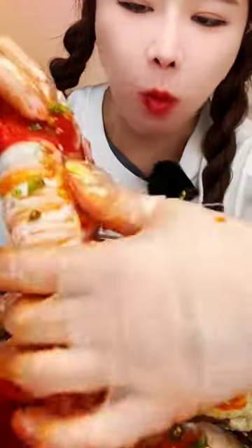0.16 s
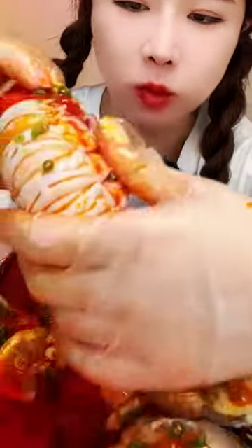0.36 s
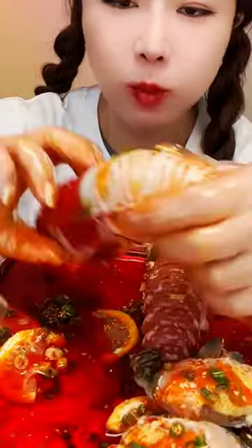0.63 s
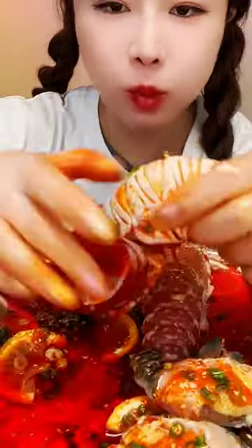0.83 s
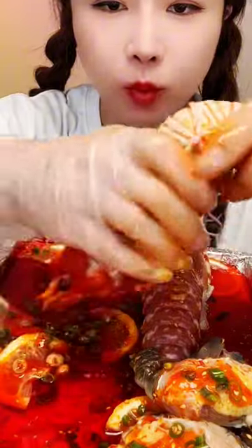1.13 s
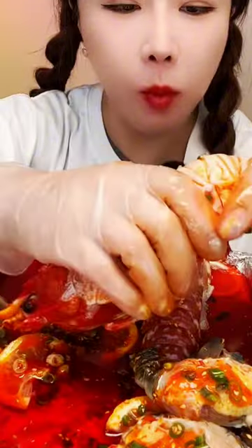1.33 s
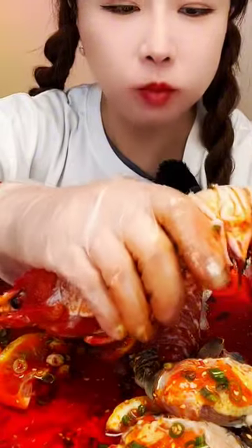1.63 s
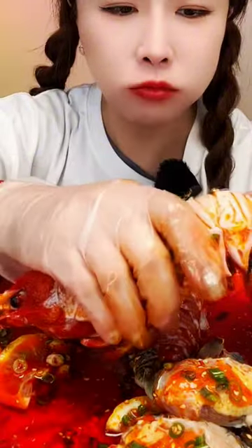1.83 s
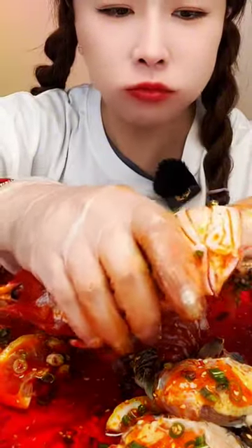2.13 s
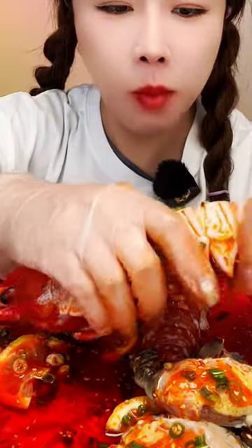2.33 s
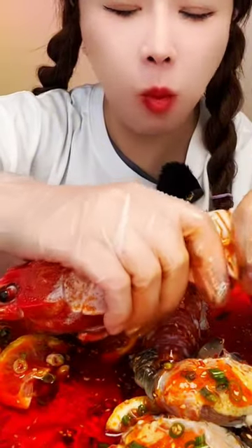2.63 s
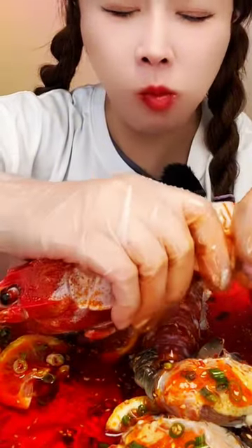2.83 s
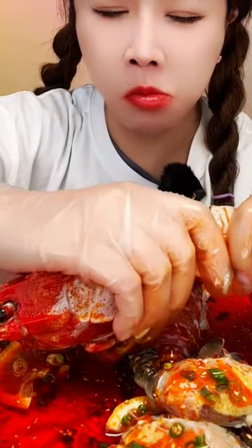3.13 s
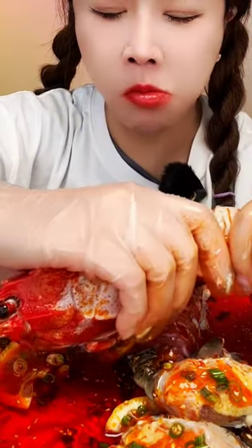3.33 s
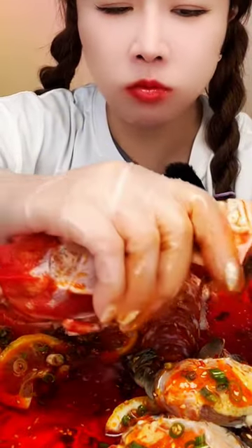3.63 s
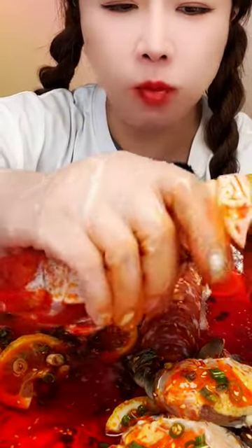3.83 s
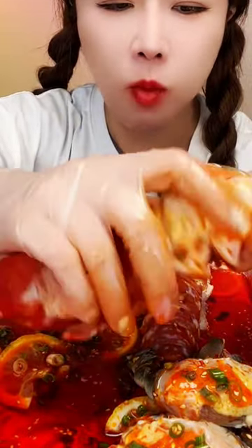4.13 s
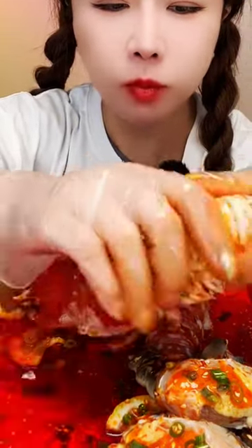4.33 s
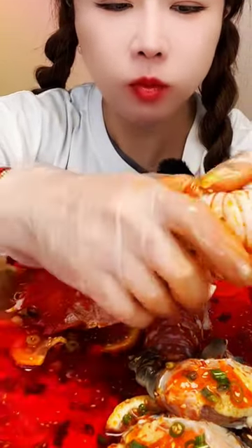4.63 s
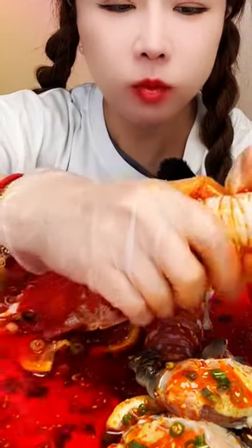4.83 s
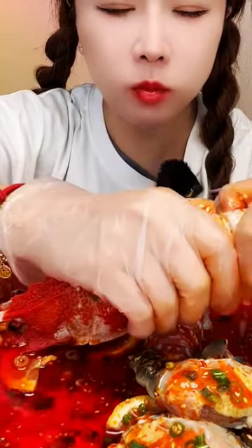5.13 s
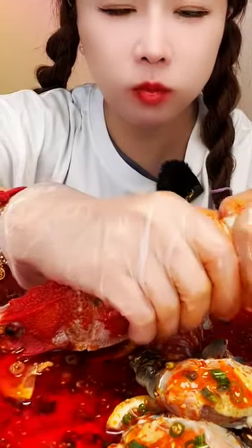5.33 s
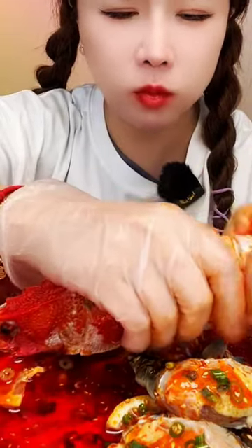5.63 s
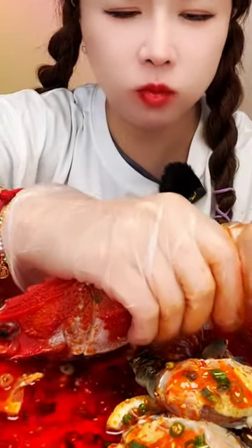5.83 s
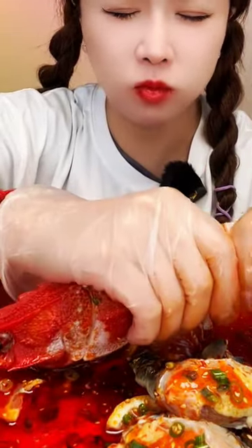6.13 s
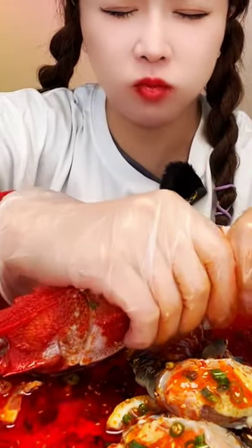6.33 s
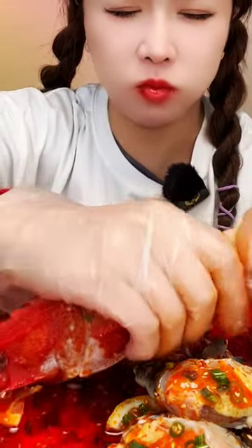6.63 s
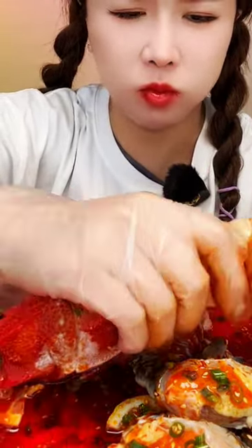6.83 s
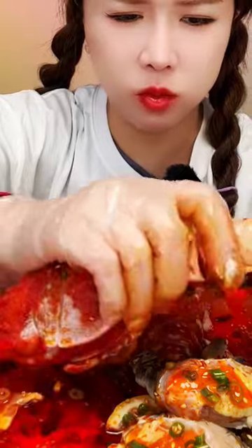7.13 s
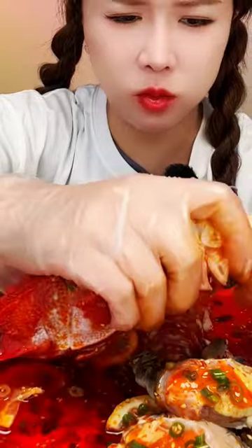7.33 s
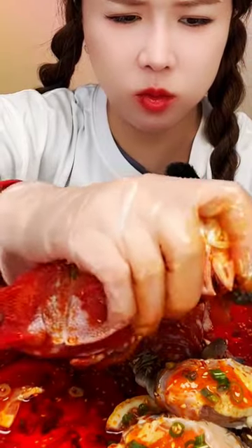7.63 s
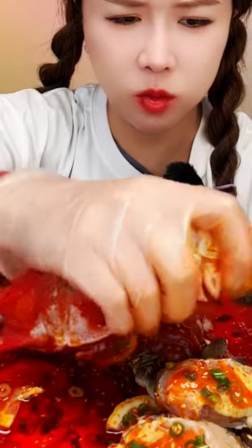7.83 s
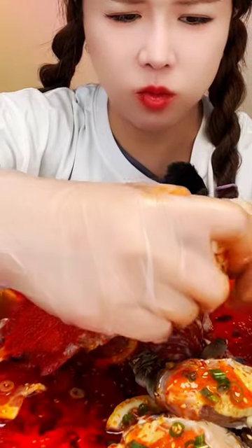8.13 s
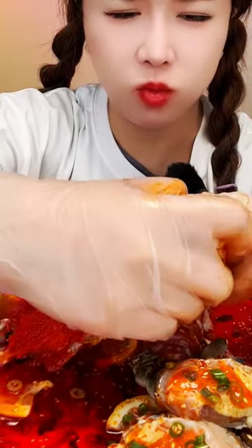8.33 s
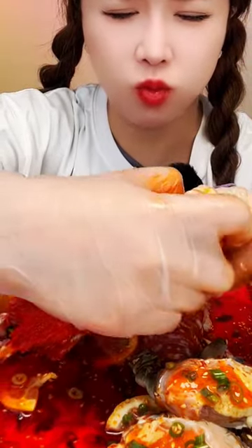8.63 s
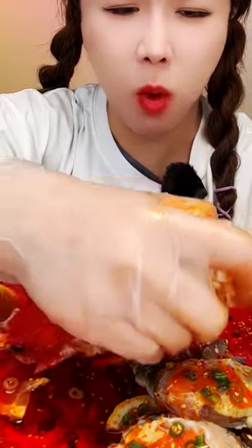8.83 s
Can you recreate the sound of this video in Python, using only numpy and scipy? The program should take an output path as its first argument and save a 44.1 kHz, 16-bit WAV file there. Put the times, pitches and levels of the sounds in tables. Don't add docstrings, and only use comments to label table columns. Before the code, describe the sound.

Hands in film gloves pull cooked shellfish apart, very near and dry. A wet, crackly rustle runs throughout, rising and falling with each squeeze. Brittle shell breaks jump out, thick ones clacking and thin rims snapping very brightly, with taps, flicked splinters and short rattles between. Sauce bubbles pop and flesh tears mostly in the first half. A low table hum briefly surfaces near three seconds, beneath soft room rumble.

```python
import sys
import numpy as np
from scipy import signal
from scipy.fft import rfft, irfft
from scipy.io import wavfile
from scipy.ndimage import uniform_filter1d

SR = 44100
rng = np.random.default_rng(int(sys.argv[2]) if len(sys.argv) > 2 else 0)


def wav_record(signal):
    frames = np.transpose(np.atleast_2d(signal))
    bounded = np.clip(frames, -1, 1)
    quanta = np.round(bounded * 32767).astype(np.int16)
    wavfile.write(sys.argv[1], SR, quanta)


def attenuation_scalar(level_db):
    decades = np.asarray(level_db, float) / 20
    return 10 ** decades


N = 395577
TIME_S = np.arange(N) / SR

# start_s, motion_db, wetness_db
HAND_MOTION = [(0., -40, 0), (.72, -41.5, -1.5), (.95, -38, 0), (1.45, -43.5, 0), (1.7, -48.5, -1),
               (2.2, -41.5, 0.5), (2.7, -47.5, -0.5), (3.0, -46.5, 0.5), (3.42, -44, 2), (3.6, -36.5, -5),
               (4.45, -42, -5.5), (5.0, -44.5, 3), (5.5, -37, -3.5), (6.3, -49.5, 0), (7.1, -45.5, -3.5),
               (7.4, -40.5, -1.5), (8.3, -47, -3.5), (8.97, -45.5, -1.5)]
# centre_s, half_length_s, lift_db
SQUEEZES = [
    (1.06, 0.073, 3.5),
    (1.39, 0.22, 6.5),
    (2.44, 0.18, 8),
    (4.222, 0.29, 15),
    (4.734, 0.21, 8.5),
    (6.805, 0.52, 7.5),
    (7.244, 0.075, 5.5),
    (2.192, 0.067, -14),
    (7.074, 0.093, -1),
    (8.9, 0.38, 7.5),
]
# freq_hz, density_db_per_hz
FILM_SPECTRUM = [(1300, -2.5), (2200, -7), (2900, -15), (3700, -2), (4400, -1.5), (6600, -3), (7400, -6.5),
                 (10600, -3), (13100, -11.5), (13600, -14), (15700, -15), (16000, -20)]
# freq_hz, density_db_per_hz
FLESH_SPECTRUM = [
    (150, -14.5),
    (250, -6.5),
    (539, -8.5),
    (600, -6.5),
    (800, -8.5),
    (1150, -8.5),
    (1290, -9),
    (3200, -19.5),
    (4160, -17.5),
    (7040, -120),
]
# freq_hz, density_db_per_hz
SHELL_SPECTRUM = [
    (300, -39),
    (2200, -13.5),
    (2860, -14),
    (4280, -3.5),
    (8100, -7),
    (9540, -2),
    (15000, -12.5),
    (16500, -20),
]
# freq_hz, density_db_per_hz
ROOM_SPECTRUM = [
    (15, -17),
    (48, -10.5),
    (90, -3),
    (145, 0),
    (356, -5.5),
    (492, -12.5),
    (1000, -22.5),
    (1300, -23),
    (2200, -120),
]
# start_s, peak_db, ring_hz
JOINT_CLICKS = [(0.19, -21, 1180), (0.6859, -15, 1210), (1.243, -24, 2110), (1.2706, -21.5, 2090),
                (1.4669, -16, 1160), (2.08, -27, 1210), (2.2474, -25, 2020), (2.272, -26, 2040),
                (2.558, -22.5, 1930), (2.9984, -15, 1730), (3.3523, -28, 1550), (3.551, -22, 1400),
                (3.6795, -20, 1900), (3.724, -33, 1380), (3.777, -27, 3190), (3.8717, -24, 1460),
                (4.162, -33, 1250), (4.1828, -17.5, 1220), (4.2619, -30, 1470), (4.4638, -30, 2710),
                (4.7687, -20.5, 1420), (5.5526, -32, 1460), (6.8147, -28, 1810), (6.9045, -24.5, 3230),
                (7.06, -27, 1200), (7.178, -31, 1340), (7.5633, -23, 1980), (7.802, -24, 3190),
                (8.027, -30, 1100), (7.8714, -26, 1590), (8.3666, -34, 1980), (8.6416, -30, 1150),
                (8.7156, -26, 1450), (8.8284, -27, 1210), (8.9217, -21, 2240), (8.9521, -19.5, 2450)]
# start_s, peak_db, ring_hz
BRIGHT_CRACKLES = [(0.0287, -22, 4260), (0.0908, -25, 3920), (0.164, -26, 4220), (0.293, -20, 5000),
                   (0.3941, -31, 3830), (0.4943, -26, 6720), (0.718, -8.5, 5160), (0.9444, -22, 9130),
                   (1.242, -16, 10680), (1.34, -18, 4480), (1.611, -30, 6650), (1.7112, -19.5, 6300),
                   (1.7327, -22, 5560), (2.146, -27, 4180), (2.2223, -27, 5800), (2.271, -22, 4070),
                   (2.4586, -23, 7970), (2.514, -29, 5900), (2.6393, -30, 5210), (4.17, -13, 4500),
                   (3.2968, -32, 8800), (3.314, -21.5, 10420), (3.4121, -30, 10420), (7.7693, -27, 6000),
                   (3.7026, -32, 5680), (3.7232, -27, 5040), (3.8157, -25, 6550), (3.8963, -24, 5860),
                   (4.0796, -17, 11020), (4.0922, -21, 4170), (4.3955, -30, 4570), (4.7262, -20, 6850),
                   (5.0244, -26, 10900), (5.081, -20, 4900), (5.1699, -28, 6000), (5.2126, -30, 5000),
                   (3.3515, -13, 6500), (5.8309, -23.5, 7840), (5.0711, -7.5, 4540), (6.2268, -29, 11580),
                   (6.293, -26, 5500), (6.3268, -24, 9000), (6.6994, -23.5, 5640), (6.7617, -26, 4540),
                   (6.818, -25, 6600), (7.045, -26, 5600), (7.1203, -22, 10200), (7.444, -28, 4520),
                   (7.4622, -25, 10120), (7.502, -28, 4000), (7.589, -21, 9780), (7.6962, -29, 5000),
                   (7.7279, -20, 5810), (7.952, -13, 9690), (8.253, -20, 6800), (8.4284, -21, 9170),
                   (8.4893, -26, 8790), (8.8418, -21, 10720), (8.852, -18, 5120), (8.858, -18.5, 6070),
                   (0.5209, -9.5, 8300), (1.5087, -26, 3700), (1.9158, -35, 5030), (2.2585, -31, 6290),
                (2.9147, -30, 12100), (3.1352, -12, 9400), (3.1389, -20.5, 9170), (3.3045, -29, 9520),
                (2.1545, -27, 4200), (8.0595, -10, 10500), (3.3353, -30, 7900), (3.6124, -16.5, 4130),
                (3.8254, -22, 9690), (4.093, -15, 4300), (4.2065, -8.5, 4150), (4.6191, -24, 9820),
                (5.0207, -27.5, 3790), (5.0558, -28, 4690), (5.1448, -25, 5560), (5.3775, -28, 5380),
                (5.4039, -27, 4870), (5.4232, -19, 9500), (5.5823, -20, 5040), (5.595, -18, 5260),
                (5.7499, -15.5, 11110), (5.8628, -28, 4570), (6.3534, -25.5, 8010), (2.159, -27, 4200),
                (6.6444, -30.5, 8050), (6.6756, -32, 6760), (7.0596, -39, 9990), (7.928, -23, 7840),
                (8.2711, -34, 4050), (8.3035, -26, 9820), (8.5455, -23, 9090), (8.9513, -6, 4830)]
# start_s, length_s, level_db, ring_hz
FLESH_TEARS = [(0.301, 0.054, -31.5, 780), (0.657, 0.051, -30.5, 676), (5.895, 0.096, -46.5, 320),
               (0.907, 0.054, -37.5, 1170), (1.029, 0.074, -38.5, 634), (1.316, 0.014, -32.5, 930),
               (1.434, 0.045, -31, 476), (1.48, 0.035, -39, 800), (2.421, 0.067, -37.5, 720),
               (3.524, 0.039, -38, 676), (3.892, 0.049, -41, 570), (4.155, 0.043, -34, 990),
               (4.261, 0.041, -34.5, 1090), (4.319, 0.052, -32, 660), (4.744, 0.063, -45, 1180),
               (8.88, 0.054, -38, 1360), (0.722, 0.085, -44, 393), (1.403, 0.034, -43, 900),
               (4.044, 0.02, -46, 1510), (1.001, 0.063, -43, 1920)]
# start_s, length_s, level_db, ring_hz
GLOVE_DRAGS = [(0.633, 0.088, -36, 6050), (0.896, 0.11, -35.5, 6800), (1.316, 0.038, -35, 6600),
               (1.404, 0.072, -36.5, 6530), (1.962, 0.1, -39, 5500), (2.724, 0.094, -41, 8230),
               (4.08, 0.059, -38, 6800), (4.138, 0.084, -28, 4800), (4.281, 0.018, -28, 6600),
               (5.247, 0.07, -39.5, 8800), (5.407, 0.072, -38.5, 8040), (7.227, 0.14, -38.5, 6840),
               (7.48, 0.03, -32, 5260), (7.777, 0.054, -35.5, 7060), (7.946, 0.026, -39, 8640),
               (8.687, 0.08, -39.5, 6860), (8.885, 0.066, -34.5, 5900), (0.994, 0.091, -38.5, 4700),
               (1.094, 0.13, -36, 6260), (1.264, 0.051, -38, 6300), (0.935, 0.03, -32, 9000),
               (0.15, 0.037, -37.5, 4300), (0.282, 0.032, -39.5, 5200), (3.559, 0.05, -41, 4270),
               (3.963, 0.087, -47, 5300), (5.68, 0.039, -42, 5200), (7.292, 0.033, -35, 4600),
               (2.134, 0.048, -49, 4200), (8.808, 0.068, -45, 5500)]
# start_s, peak_db, ring_hz, knock_re_peak_db
PLATE_BREAKS = [(0.221, -13.5, 4400, -20), (0.717, -10.5, 5000, -3.5), (1.9636, -0.5, 3650, -18.5),
                (2.3867, -7.5, 6060, -25), (2.9975, -12.5, 6660, -27), (3.0526, -9, 6370, -18),
                (4.092, -19, 4000, -29), (4.2065, -11, 4200, -7), (4.533, -2, 5340, -25.5),
                (4.5352, -14, 5000, -23), (4.8148, -5, 5140, -17.5), (5.0711, -13, 3870, -13.5),
                (5.4233, -7, 4600, -26.5), (5.456, -12, 5800, -29), (5.595, -4.5, 4400, -37),
                (5.7283, -9.5, 4860, -25), (6.272, -7, 6160, -60), (6.4286, -2.5, 5600, -27),
                (6.5234, -11, 5400, -14.5), (6.5509, -2, 7160, -35), (6.8705, -3.5, 3750, -20.5),
                (7.8018, -5, 5200, -23), (8.0595, -4, 4150, -31), (8.9511, -7.5, 4640, -20.5)]
# start_s, peak_db, ring_hz, knock_re_peak_db
RIM_BREAKS = [(0.52, -32, 8700, -22), (0.56, -23, 8800, -0.5), (1.239, -26, 10300, -9),
              (1.7596, -12.5, 9000, -13), (1.7917, 2, 9300, -37), (1.9663, -8, 8300, -20),
              (2.0796, -10.5, 12000, -18.5), (2.7572, -11, 10100, -18), (2.761, 2.5, 8440, -33),
              (2.778, -7, 7200, -17), (3.0096, -5, 8200, -24), (3.1344, -13.5, 9300, -19),
              (3.1664, 2, 8400, -27), (3.3516, -6.5, 10200, -31), (3.836, -2, 8460, -40),
              (5.2469, -1.5, 9500, -39), (5.419, 5, 11500, -40), (5.292, -17, 8000, -34),
              (6.515, 4, 10600, -22), (7.9451, -2.5, 9100, -33), (8.3664, -12, 11000, -24),
              (8.4343, 0, 7300, -38), (8.545, -31, 9050, -30), (2.0793, -9, 6100, -32),
              (1.933, -35, 11500, -27), (8.5046, 1, 6360, -38)]
# start_s, peak_db, ring_hz
SHELL_TAPS = [(0.192, -21, 3700), (0.6858, -18, 4570), (0.9044, -14.5, 4400), (2.134, -25, 3880),
              (2.1678, -23.5, 3850), (3.483, -23.5, 4660), (3.613, -32, 3900), (4.1065, -15, 4200),
              (3.838, -8.5, 5000), (3.9184, -14, 4200), (3.9307, -9.5, 4400), (4.1095, -8, 4000),
              (4.2328, -13, 5100), (4.9204, -13.5, 4230), (5.046, -22, 4400), (5.792, -22, 4070),
              (6.0007, -27, 4580), (6.1942, -21.5, 4460), (7.487, -10.5, 4550), (7.502, -13.5, 3980),
              (7.561, -14.5, 5000), (5.259, -21, 5000), (7.716, -15, 3640), (8.126, -31, 3800),
              (7.871, -19, 4400), (8.1363, -18.5, 3750), (8.6108, -26.5, 4220), (8.631, -28.5, 4240),
              (8.645, -21, 4300), (8.8886, -11, 4200)]
# start_s, peak_db, ring_hz
FOLD_BUCKLES = [(.677, -17, 6760), (1.32, -8, 6500), (1.5205, -21, 5530), (1.7107, -28, 6130),
                (1.7238, -23, 5900), (2.328, -21.5, 6140), (2.35, -16, 6300), (2.364, -11, 5770),
                (2.4737, -18.5, 6940), (2.5586, -15, 6640), (3.534, -17.5, 6740), (3.703, -17, 5500),
                (3.7582, -17, 6650), (3.778, -11.5, 7000), (3.782, -12.5, 6000), (4.1484, -12, 5800),
                (4.276, -11.5, 7000), (4.5254, -23, 5500), (4.7497, -14, 6440), (6.31, -19.5, 7060),
                (6.42, -16, 6800), (6.695, -22.5, 5670), (6.8972, -13, 5040), (7.288, -10.5, 5400),
                (7.933, -17.5, 5400), (8.173, -16.5, 6950), (8.2473, -24, 6940), (8.67, -20, 6260),
                (8.7544, -14.5, 6230), (8.823, -13, 6600)]
# start_s, peak_db, ring_hz
SPLINTER_FLICKS = [(0.929, -15, 8800), (2.3439, -19, 9000), (2.6892, -23.5, 11500), (2.781, -11, 8600),
                   (2.926, -33, 10500), (6.272, -7.5, 11100), (3.3128, -36, 10300), (3.3242, -18, 9300),
                   (3.39, -15, 8000), (3.939, -28, 8000), (5.1924, -20.5, 9700), (5.2907, -11, 11300),
                   (5.4483, -17, 10100), (6.2343, -20, 11800), (6.5372, -13, 7000), (7.114, -24, 11400),
                   (7.167, -17, 10800), (7.607, -22, 8640), (7.9207, -26, 9900), (7.952, -26, 9600),
                   (7.9625, -12, 8900), (8.027, -21, 11100), (8.2352, -23, 10500), (8.3241, -15.5, 9450),
                   (8.341, -25, 10200), (8.393, -23, 9900), (8.5881, -20.5, 10100), (8.7165, -16, 9800),
                   (8.779, -21.5, 8800), (8.8294, -16, 9050)]
# start_s, peak_db, cavity_hz, decay_s (to -60 dB)
WET_POPS = [(0.294, -30, 396, 0.12), (0.453, -23, 670, 0.016), (0.493, -22.5, 590, 0.0078),
            (0.56, -25.5, 1284, 0.015), (0.675, -12, 576, 0.039), (0.7163, -13.5, 484, 0.016),
            (0.737, -30, 400, 0.07), (1.076, -15, 372, 0.024), (1.131, -29.5, 662, 0.04),
            (1.338, -14, 932, 0.022), (1.446, -21.5, 520, 0.04), (1.493, -17.5, 686, 0.012),
            (2.244, -31.5, 358, 0.12), (2.266, -31.5, 750, 0.025), (2.42, -28, 360, 0.074),
            (2.557, -29, 1130, 0.019), (3.534, -28, 740, 0.031), (3.68, -25, 1840, 0.0075),
            (3.872, -22.5, 730, 0.0044), (3.917, -23, 330, 0.042), (4.23, -24, 274, 0.022),
            (4.273, -20, 1074, 0.072), (1.461, -21, 525, 0.025), (4.747, -17, 1143, 0.021),
            (4.915, -27, 1108, 0.041), (5.145, -29, 804, 0.029), (0.781, -38, 380, 0.03),
            (8.887, -23.5, 915, 0.014)]
# time_s, level_db
HUM_LEVEL = [
    (2.2, -52),
    (2.5, -51),
    (2.6, -44),
    (2.7, -54.5),
    (2.95, -44),
    (3.15, -49),
    (3.35, -39),
    (3.6, -40),
    (3.78, -45),
    (3.9, -59),
]


def colour(x, spectrum):
    hz, db = np.transpose(spectrum)
    size = 2048
    grid_hz = np.maximum(np.fft.rfftfreq(size, 1 / SR), 1)
    gain_db = np.interp(np.log(grid_hz), np.log(hz), db, db[0] - 38.0, db[-1] - 31.0)
    cepstrum = irfft(np.log(attenuation_scalar(gain_db)))
    cepstrum[1:size // 2] *= 2
    cepstrum[size // 2 + 1:] = 0
    response = irfft(np.exp(rfft(cepstrum)))
    response = response / np.sqrt(np.sum(response ** 2))
    return signal.fftconvolve(x, response)[:len(x)]


def ring(x, hz, width_hz):
    b, a = signal.iirpeak(min(hz, SR / 2.2), hz / width_hz, SR)
    return signal.lfilter(b, a, x)


def unit(x):
    return x / np.sqrt(np.mean(x ** 2))


def walk(rate_hz):
    hold = int(SR / rate_hz)
    steps = np.repeat(rng.standard_normal(N // hold + 1), hold)
    return uniform_filter1d(steps, hold)[:N]


def add(out, start_s, peak_db, x):
    i = int(start_s * SR)
    x = x[:N - i]
    out[i:i + len(x)] += x * attenuation_scalar(peak_db) / np.max(np.abs(x))


def hands():
    start_s, motion_points_db, wet_points_db = np.transpose(HAND_MOTION)
    motion_db = np.interp(TIME_S, start_s, motion_points_db)
    wet_db = np.interp(TIME_S, start_s, wet_points_db)
    for centre_s, half_s, lift_db in SQUEEZES:
        motion_db += lift_db * np.clip(1 - np.abs(TIME_S - centre_s) / half_s, 0, 1)
    return motion_db, wet_db


def grains(spectrum, centres_hz, rate_hz, spread_db, own_db, smear_s, hiss_db, flicker_db, flicker_hz):
    bunch = attenuation_scalar(flicker_db * walk(flicker_hz))
    tick_db = spread_db * np.minimum(rng.exponential(size=N), 3.)
    ticks = (rng.random(N) < rate_hz / SR) * attenuation_scalar(tick_db)
    decay = np.exp(-1 / (smear_s * SR))
    out = 0
    for hz in centres_hz:
        share = signal.lfilter([1], [1, -decay], ticks * attenuation_scalar(own_db * rng.standard_normal(N)))
        hiss = attenuation_scalar(hiss_db + 5.8 * walk(30.))
        drive = (unit(share) + hiss) * rng.standard_normal(N)
        out = out + ring(drive, hz, 0.38 * hz)
    return unit(colour(out * bunch, spectrum))


def room(motion_db):
    rumble = unit(colour(rng.standard_normal(N), ROOM_SPECTRUM) * attenuation_scalar(1.6 * walk(7.)))
    return rumble * attenuation_scalar(-45 + 0.14 * (motion_db - np.mean(motion_db)))


def crackle():
    lead_s = .003
    events = JOINT_CLICKS + BRIGHT_CRACKLES
    out, t = np.zeros(N), np.arange(int(SR / 50)) / SR - lead_s
    lag = np.abs(t)
    strain = attenuation_scalar(-16.5) * np.exp(-lag / 0.0019)
    release = np.exp(-lag / 0.00023) + attenuation_scalar(-22) * np.exp(-lag / 0.007)
    shape = np.where(t < 0, strain, release)
    kick = np.diff((t >= 0) * 1., prepend=0)
    for start_s, peak_db, hz in events:
        burst = rng.standard_normal(len(t)) * shape + kick
        piece = ring(ring(burst, hz, 0.92 * hz), hz, 0.37 * hz)
        add(out, start_s - lead_s, peak_db, piece + attenuation_scalar(-15) * ring(burst, 5700.0, 5500.0))
    return out


def crunch():
    out, t = np.zeros(N), np.arange(int(SR / 6)) / SR
    for start_s, length_s, level_db, hz in FLESH_TEARS + GLOVE_DRAGS:
        when, size, fine = rng.standard_normal((3, len(t)))
        attack = np.clip(t / (0.21 * length_s), 0, 1)
        swell = attack * np.clip((length_s - t) / (0.25 * length_s), 0, 1)
        slips = signal.lfilter([1], [1, -.9], (when > 2.4) * attenuation_scalar(3.5 * size)) + 0.55
        body = colour(swell * slips * fine, FLESH_SPECTRUM if hz < SR / 16 else FILM_SPECTRUM)
        body = body + 3.3 * ring(body, hz, 1.5 * hz) + 7.0 * ring(body, hz, .2 * hz)
        body *= attenuation_scalar(level_db) * np.sqrt(length_s * SR / np.sum(body ** 2))
        i = int(start_s * SR)
        out[i:][:len(t)] += body[:N - i]
    return out


def shell():
    creak_s = .014
    out, t = np.zeros(N), np.arange(int(SR / 10)) / SR - creak_s
    after, lag = t >= 0, np.abs(t)
    events = [(*snap, -23 - 0.57 * snap[1]) for snap in PLATE_BREAKS + RIM_BREAKS]
    # knock_db, rattle_db
    events += [(*tick, -25, -17) for tick in SHELL_TAPS + FOLD_BUCKLES + SPLINTER_FLICKS]
    creak = ~after * (attenuation_scalar(-35) * np.exp(-lag / .007) + attenuation_scalar(-21) * np.exp(-lag / .0005))
    kick = np.diff(after * 1., prepend=0)
    edge = after * np.exp(-lag / 0.00018)
    thump = after * np.exp(-lag / 0.003)
    settle = after * (1 - t / t[-1]) * (np.exp(-lag / 0.003) + attenuation_scalar(-12.0) * np.exp(-lag / 0.043))
    for start_s, peak_db, hz, knock_db, rattle_db in events:
        fine, rough, dull = rng.standard_normal((3, len(t)))
        rattle = attenuation_scalar(rattle_db + 10 * uniform_filter1d(rough, size=40)) * settle
        burst, tail = fine * (creak + edge) + 0.8 * kick, fine * rattle
        pitch = (2.0 - 0.09 * peak_db) * ring(burst + 0.6 * tail, hz, 0.23 * hz)
        add(out, start_s - creak_s, peak_db, colour(burst + tail + pitch, SHELL_SPECTRUM))
        knock = ring(colour(dull * thump, FLESH_SPECTRUM), 1070.0, 1950.0)
        add(out, start_s - creak_s, peak_db + knock_db, knock)
    return out


def pops():
    out, t = np.zeros(N), np.arange(int(SR / 8)) / SR
    for start_s, peak_db, hz, t60_s in WET_POPS:
        noise = rng.standard_normal(len(t))
        fade = (1 - np.exp(-t / 0.012)) * np.exp(-np.log(1000) * t / max(t60_s, 1 / 200))
        bubble = np.sin(2 * np.pi * hz * (t + 1.24 * t ** 2))
        push = 0.58 * colour(noise, FLESH_SPECTRUM) + 0.5 * ring(noise, hz, 0.25 * hz)
        add(out, start_s, peak_db, fade * (bubble + push))
    return out


def hum():
    hum_hz, width_hz = 89, 10
    time_s, level_db = np.transpose(HUM_LEVEL)
    rough = ring(rng.standard_normal(N), hum_hz, width_hz)
    rough = unit(ring(rough, hum_hz, width_hz))
    tone = np.sin(2 * np.pi * np.cumsum(hum_hz + walk(10.) * 2) / SR)
    return unit(tone * 1.4 + rough * .6) * attenuation_scalar(np.interp(TIME_S, time_s, level_db, -90, -90))


def duck(loud, start_db, share, release_s):
    keep = np.exp(-1 / (release_s * SR))
    power = signal.lfilter([1 - keep], [1, -keep], loud ** 2)
    return (1 + power / attenuation_scalar(2 * start_db)) ** (-share / 2)


def scene():
    motion_db, wet_db = hands()
    film = grains(FILM_SPECTRUM, [2700, 3900, 5200, 7000], rate_hz=260., spread_db=3.2, own_db=5.5,
                  smear_s=0.0008, hiss_db=-2., flicker_db=2.3, flicker_hz=40.)
    thin = grains(FILM_SPECTRUM, [8500, 10500, 12500, 15000], rate_hz=230., spread_db=3.1, own_db=4.5,
                  smear_s=.0004, hiss_db=-3., flicker_db=2.2, flicker_hz=40.)
    wet = grains(FLESH_SPECTRUM, 330 * 2 ** np.arange(0, 3.5, .5), rate_hz=100., spread_db=2.6, own_db=4.5,
                 smear_s=.002, hiss_db=0.5, flicker_db=2.2, flicker_hz=30.)
    thin_db = -46 + 0.85 * (motion_db - np.mean(motion_db))
    steady = film * attenuation_scalar(motion_db) + thin * attenuation_scalar(thin_db) + wet * attenuation_scalar(motion_db + wet_db)
    snaps = shell()
    steady *= duck(snaps, start_db=-42, share=0.55, release_s=0.13)
    steady *= duck(snaps, start_db=-35.5, share=0.96, release_s=0.11)
    rumble = (hum() + room(motion_db)) * duck(snaps, start_db=-39.5, share=1.4, release_s=0.11)
    return (snaps + pops() + crunch() + crackle() + rumble + steady)[None]


def dropouts(x, share):
    def blur(cells):
        return uniform_filter1d(uniform_filter1d(cells, size=17, axis=-1), size=9, axis=-2)

    hz, _, cells = signal.stft(x, SR, nperseg=256)
    power = np.abs(cells) ** 2 + 1e-18
    loud = blur(power)
    usual = np.exp(blur(np.log(power)))
    patch = uniform_filter1d(power, size=3, axis=-1)
    faint = patch < share * np.abs(loud) ** .15 * usual ** .85
    lost = faint & (hz[:, None] > SR / 18)
    return signal.istft(cells * np.where(lost, .2, 1), SR, nperseg=256)[1][..., :N]


def band_limit(x):
    return signal.sosfilt(signal.butter(12, 16810, fs=SR, output="sos"), x)


def record(dry):
    x = dropouts(dry, share=.26)
    x = 1.08 * np.tanh(x / .56) * .56
    top_cut = signal.ellip(8, .2, 60, 16400, fs=SR, output="sos")
    x = signal.sosfilt(top_cut, x)
    return band_limit(x)


dry = scene()
out = record(dry)
wav_record(out)
```